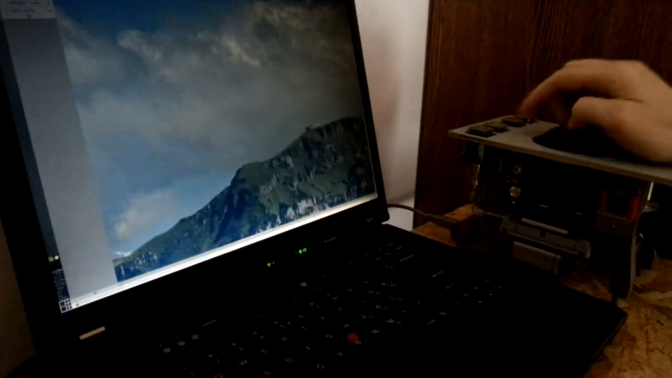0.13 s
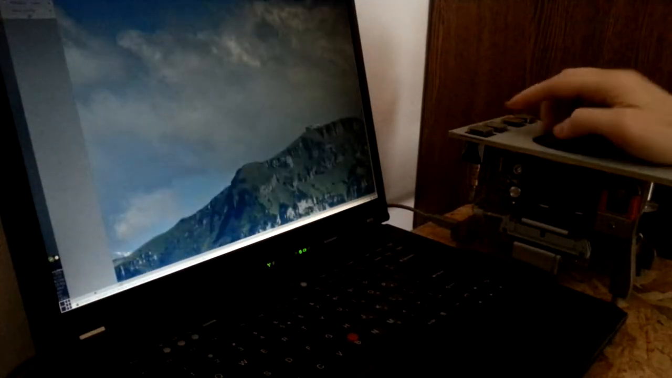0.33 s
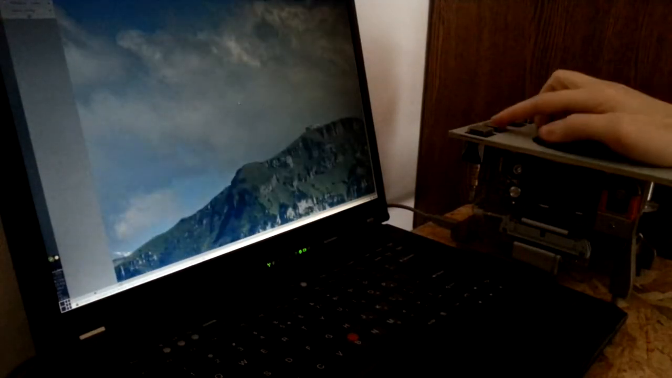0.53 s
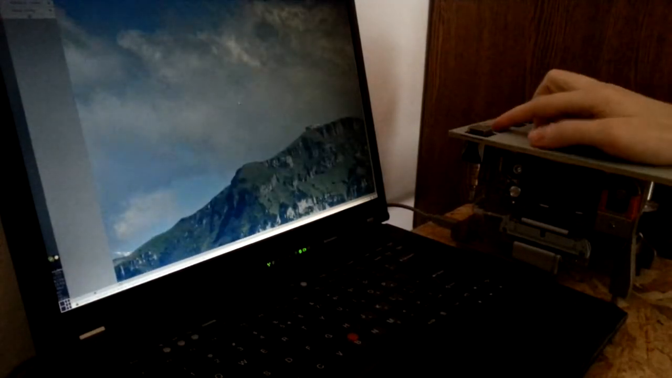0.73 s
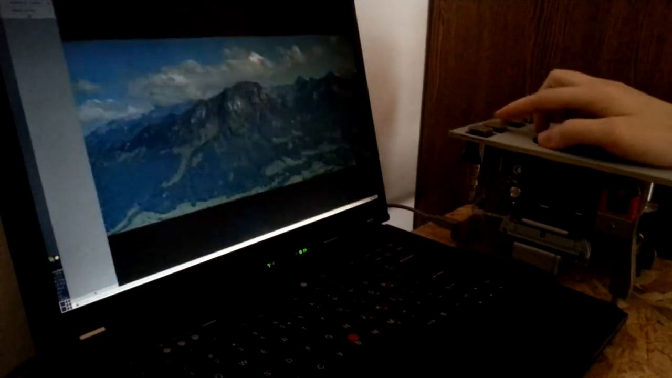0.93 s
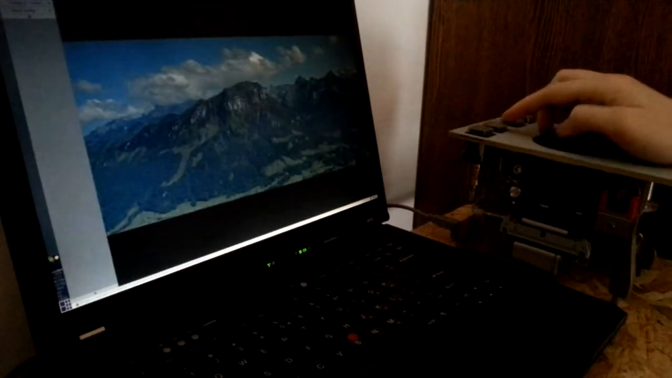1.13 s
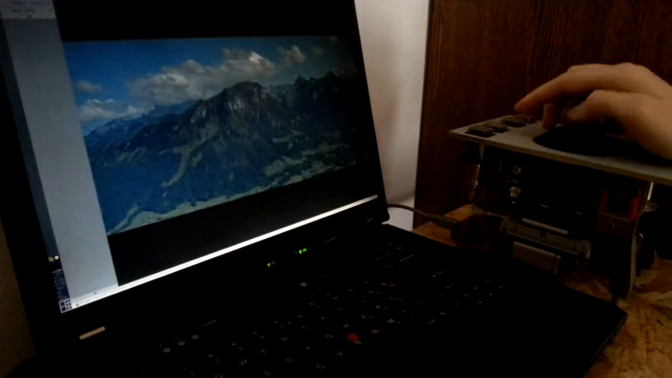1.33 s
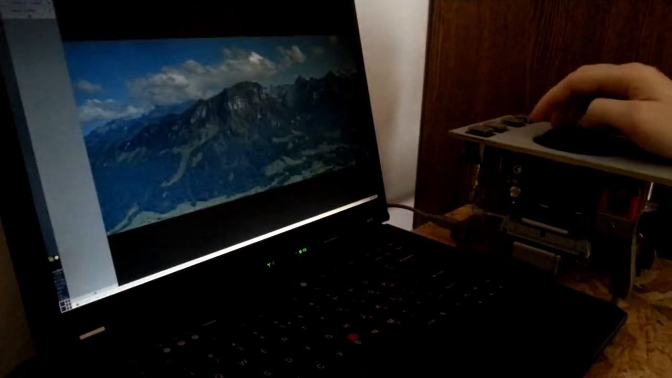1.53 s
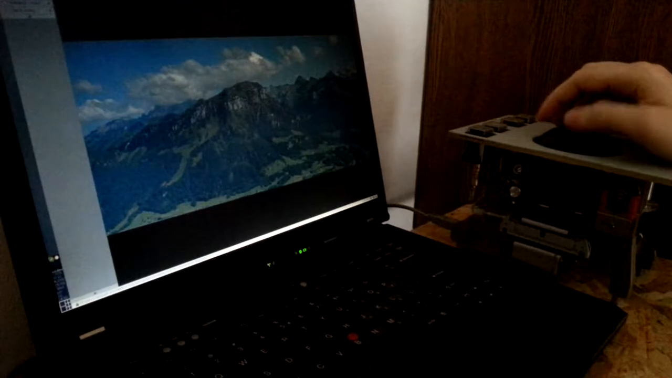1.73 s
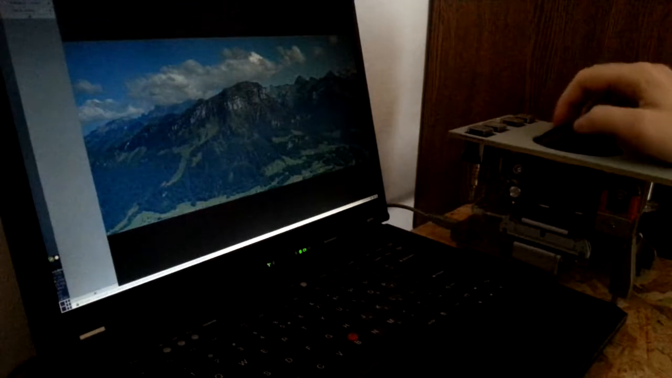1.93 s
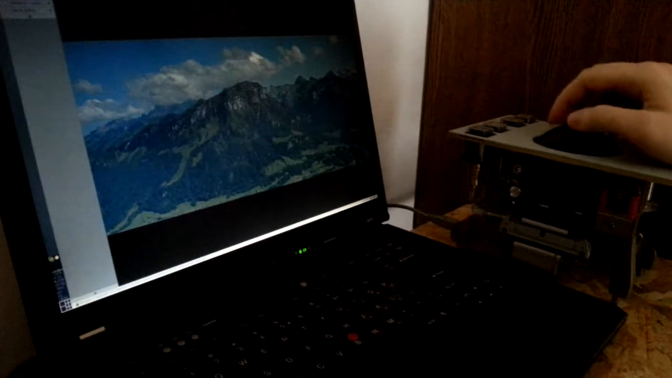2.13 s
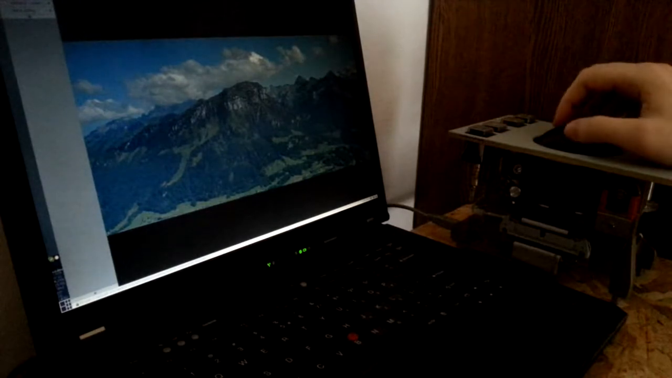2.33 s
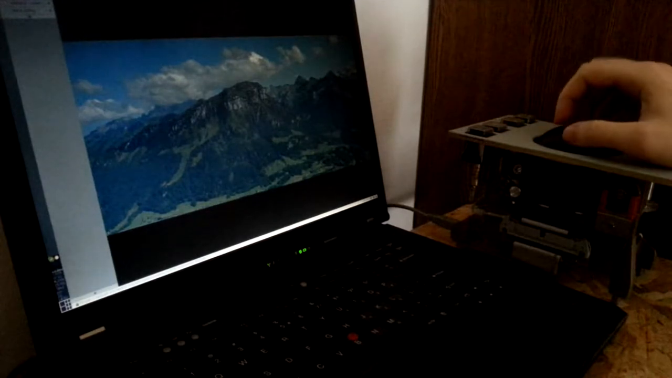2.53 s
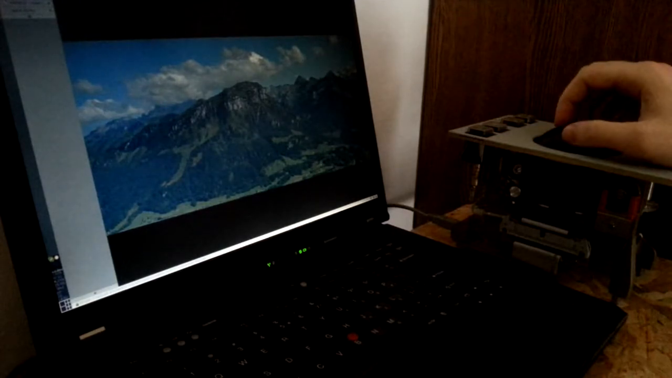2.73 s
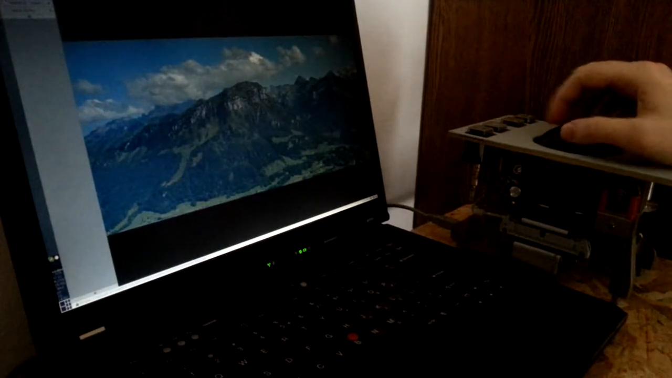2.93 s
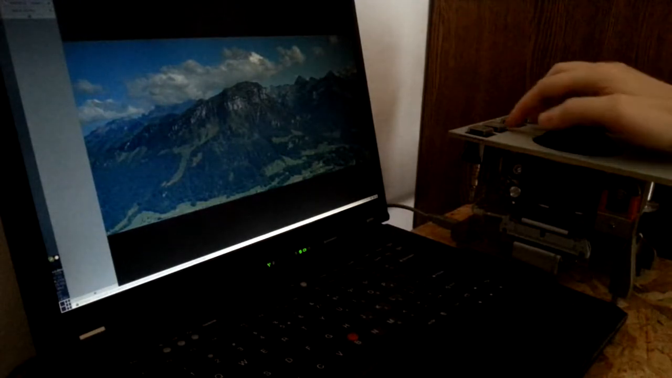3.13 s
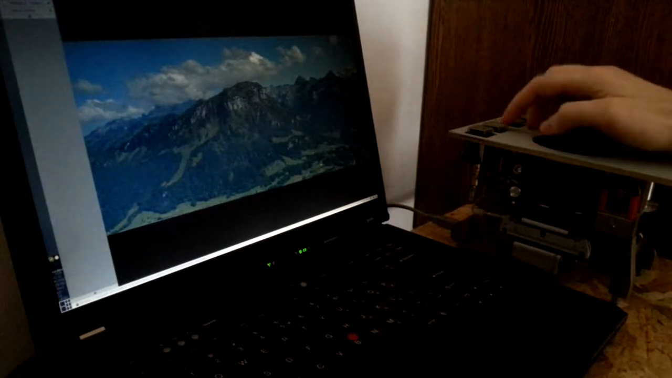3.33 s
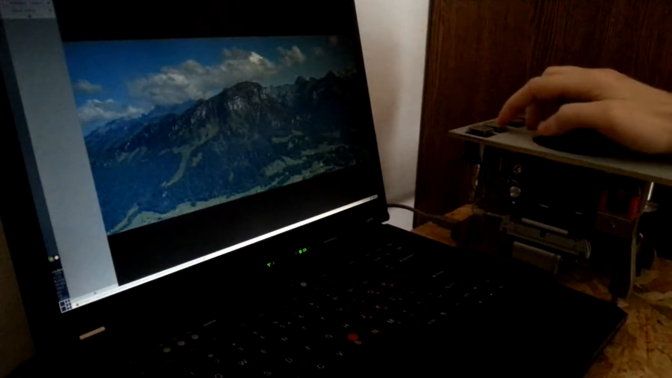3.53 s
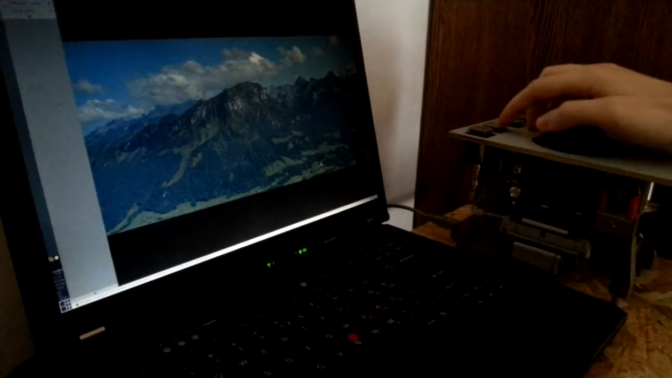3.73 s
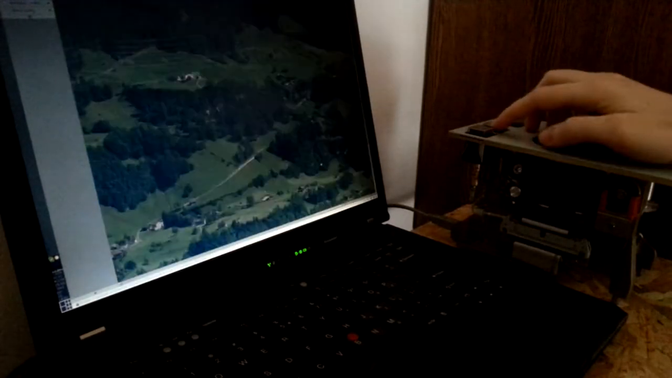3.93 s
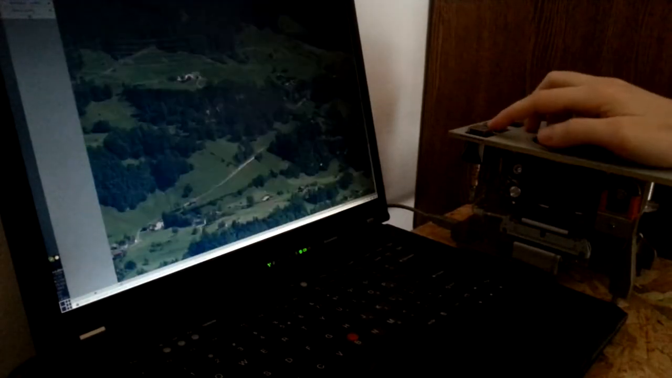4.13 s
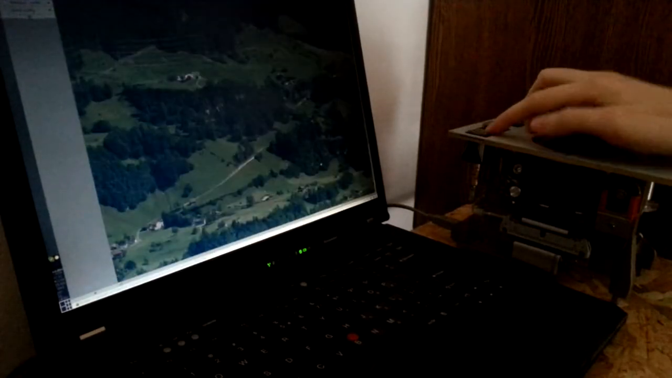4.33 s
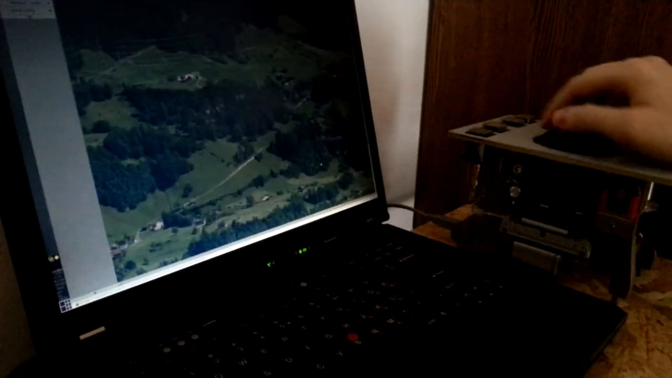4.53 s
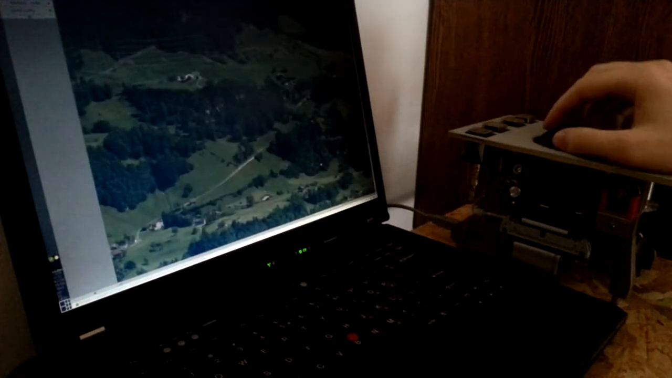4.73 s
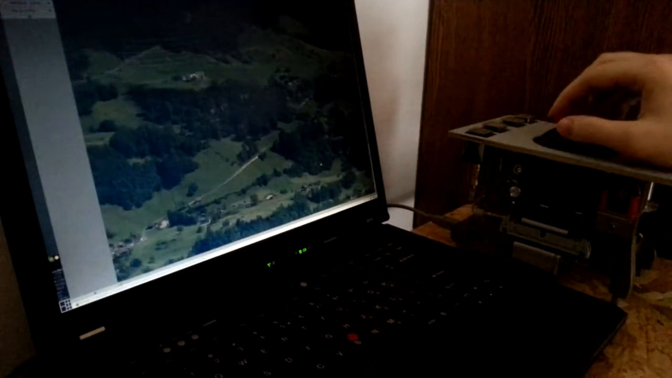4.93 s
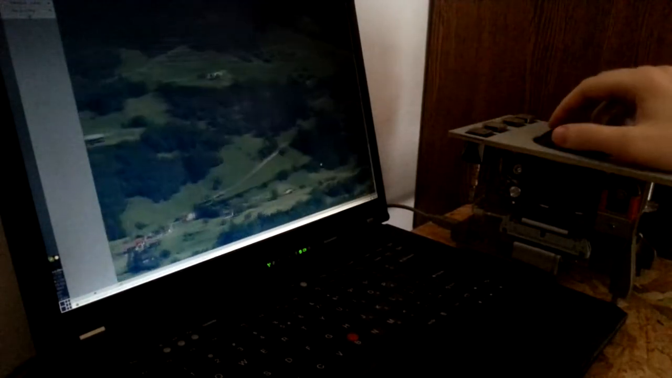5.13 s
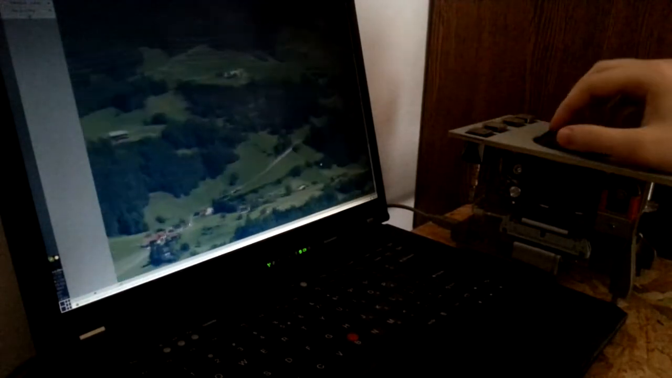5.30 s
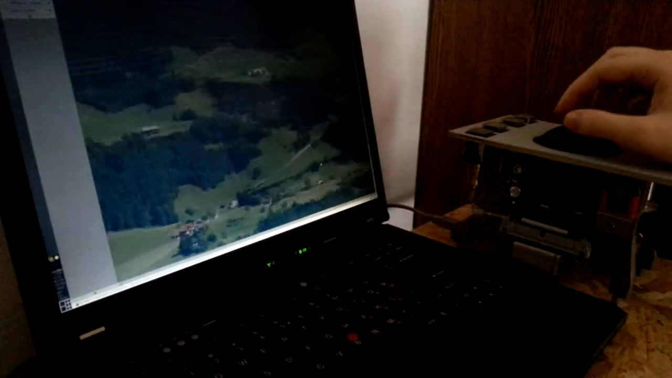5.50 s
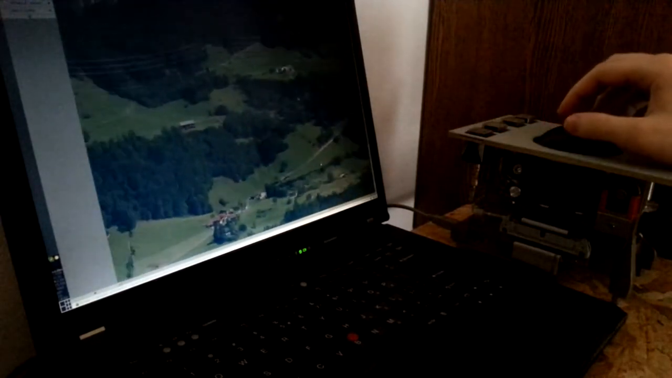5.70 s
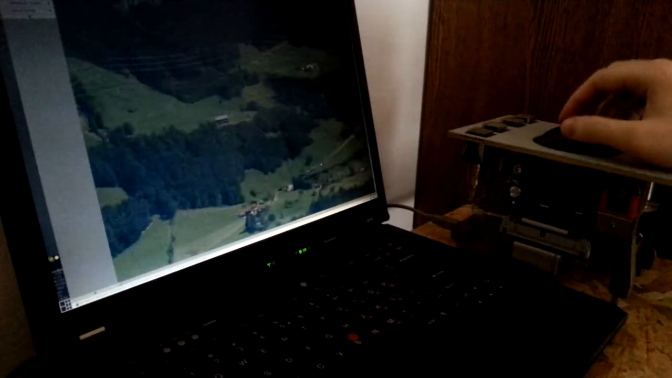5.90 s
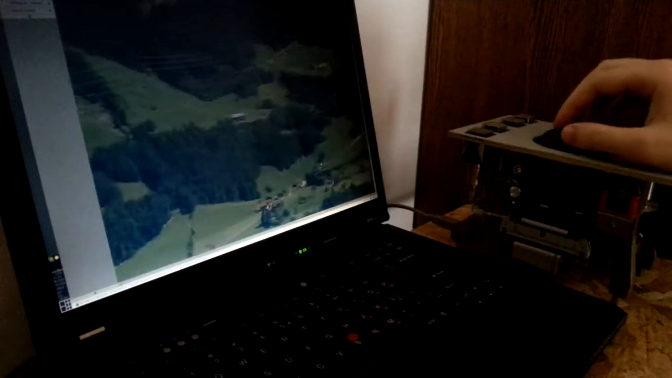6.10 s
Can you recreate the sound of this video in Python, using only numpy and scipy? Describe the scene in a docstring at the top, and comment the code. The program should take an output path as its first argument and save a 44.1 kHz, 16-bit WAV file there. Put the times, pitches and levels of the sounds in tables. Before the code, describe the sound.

A heavy ball is turned by hand in a hollow housing with low grainy rumbles, broken by sharp key clicks, while a clock ticks faintly.

```python
"""A heavy metal ball is turned by hand in an open housing on a desk: noise force rings the housing's modes.
Keys are pressed and let go three times, the third time a different key: finger thud (housing modes),
sharp snap and rattle (noise bursts). A clock ticks across the small room (decaying noise); a fingertip
squeaks on the ball (narrow-band noise). Microphone hiss, rumble and a faint whistle lie beneath."""
import sys
import numpy as np
from scipy import signal
from scipy.fft import rfft, irfft
from scipy.io import wavfile
from scipy.ndimage import uniform_filter1d

SR = 44100
rng = np.random.default_rng(int(sys.argv[2]) if len(sys.argv) > 2 else 0)


def rack_gain(trim_db):
    """Turn a fader trim in dB into the linear factor to multiply a signal by."""
    fader = np.asarray(trim_db, float)
    return 10 ** (fader / 20)


def to_wav(sig):
    """Store sig (one row per channel, or 1-D mono) as 16-bit WAV at the path in sys.argv[1].

    Samples outside -1..1 are clipped; the rate is SR.
    """
    pcm = np.clip(np.atleast_2d(sig), -1, 1) * 32767
    pcm = np.round(pcm).astype(np.int16)
    wavfile.write(sys.argv[1], SR, pcm.T)  # frames by channels


N = 271656


def colour(x, points):
    """Filter by gain points (frequency [Hz], gain [dB]), interpolated over log frequency."""
    hz, db = np.transpose(points)
    f = np.maximum(np.arange(N // 2 + 1) * SR / N, 1)
    gain_db = np.interp(np.log(f), np.log(hz), db)
    return irfft(rfft(x) * rack_gain(gain_db), N)


def unit(x):
    """Scale to rms 1."""
    return x / np.sqrt(np.mean(x ** 2))


def ring(x, hz, t60_s):
    """One damped mode; a unit impulse rings with amplitude 1."""
    radius = np.exp(-np.log(1000) / (t60_s * SR))
    w = 2 * np.pi * hz / SR
    return signal.lfilter([0, np.sin(w)], [1, -2 * radius * np.cos(w), radius ** 2], x)


def band(x, hz, width_hz):
    """Resonant band-pass."""
    b, a = signal.iirpeak(hz, hz / width_hz, SR)
    return signal.lfilter(b, a, x)


def add(track, start_s, x):
    """Mix x into the track from start_s."""
    i = int(start_s * SR)
    track[..., i:i + x.shape[-1]] += x[..., :N - i]


def sides(x, left_minus_right_db, lag_samples):
    """Place a source in stereo by level difference and a later left channel."""
    left = np.roll(x, lag_samples) * rack_gain(left_minus_right_db / 2)
    right = x * rack_gain(-left_minus_right_db / 2)
    return np.array([left, right])


def hiss():
    """Microphone hiss, unrelated left and right; shared room rumble; a faint thin whistle of narrow noise."""
    # hiss spectrum: (frequency [Hz], relative density [dB])
    hiss_spectrum = [(20, -14), (60, 1), (120, 0), (200, 2.5), (350, 3.5), (700, 1.5), (1400, -0.5),
                     (2800, -3.5), (4200, -5), (5300, 0.5), (6300, -4.5), (9000, -7), (15500, -10.5)]
    rumble_spectrum = [(30, -38), (120, 0.5), (200, 0), (330, -18), (700, -7), (1500, -40)]
    left, right, common = rng.standard_normal((3, N))
    own = colour(np.array([left, right]), hiss_spectrum)
    rumble = colour(common, rumble_spectrum)
    whistle = band(rng.standard_normal((2, N)), 7307, 25)
    return rack_gain(-46) * (unit(own) + rack_gain(-14.5) * unit(rumble) + rack_gain(-19) * unit(whistle))


def rolling():
    """Force envelopes on frame, top plate and bearing: strokes rise, slope and stop, with lurches and wander."""
    # hand strokes: (start [s], length [s], first level [dB], last level [dB], top plate minus frame [dB])
    strokes = [(0.05, 0.4, -40, -51, 1), (0.95, 0.1, -50, -54, 10), (1.03, 0.42, -45, -38, 2),
               (1.53, 0.36, -42, -44, -2), (1.89, 0.46, -34.5, -40, 0), (2.42, 0.35, -30, -43, 1),
               (3.11, 0.2, -45, -50, 0), (3.35, 0.04, -46, -42, -8), (4.58, 0.08, -42, -56, 4),
               (4.7, 0.52, -35, -51, 2), (5.255, 0.55, -36, -38, 1), (5.82, 0.2, -46, -48, 0),
               (6.04, 0.2, -42, -28, -4)]
    # ball lurches on its rollers: (time [s], level change [dB], change of top plate minus frame [dB])
    lurches = [(0.085, -6, 0), (0.142, 5, 2), (0.195, 5, 2), (0.285, 7, -4), (0.35, 3, 0), (1.2, 2, 2),
               (1.275, 2, 0), (1.33, 2, 2), (1.41, 4, -8), (1.6, 2, 0), (1.87, 1, -8), (2.12, 4, -5),
               (2.19, 3, -3), (2.28, -2, 8), (2.33, 2, 0), (2.45, 0, 12), (2.52, 0, -6), (2.66, 3, -2),
               (2.71, -2, 10), (2.775, 1, -12), (3.14, 9, -8), (3.198, 3, -2), (3.285, 5, 2),
               (4.745, -10, 0), (4.83, 1, -6), (4.87, 4, 0), (4.99, 2, 6), (5.045, 4, -7), (5.105, 2, -7),
               (5.375, 0, -8), (5.435, 2, 5), (5.555, -2, -3), (5.69, 1, -10), (5.735, 3, -6), (5.89, 5, 0),
               (6.12, 5, 0)]
    rise_s, stop_s, rest_db, lurch_sigma_s = 0.06, 0.04, -65, 0.015
    bearing_db, bearing_slope, loud_roll_db = -52.5, 1.2, -35  # the whirr grows faster than the drone
    wander_db, wander_hz = 1.5, 14
    t = np.arange(N) / SR
    level_db, lean_db = np.full(N, float(rest_db)), np.zeros(N)
    for start_s, length_s, first_db, last_db, stroke_lean_db in strokes:
        end_s = start_s + length_s
        rise, stop = (t - start_s) / rise_s, (end_s - t) / stop_s + 1
        grip = np.clip(np.minimum(rise, stop), 1e-4, 1)
        stroke_db = np.interp(t, [start_s, end_s], [first_db, last_db]) + 20 * np.log10(grip)
        lean_db = np.where(stroke_db > level_db, stroke_lean_db, lean_db)
        level_db = np.maximum(level_db, stroke_db)
    for at_s, change_db, lean_change_db in lurches:
        swell = np.exp(-((t - at_s) / lurch_sigma_s) ** 2 / 2)
        level_db = level_db + change_db * swell
        lean_db = lean_db + lean_change_db * swell
    hold = int(SR / wander_hz)
    steps = np.repeat(rng.standard_normal((3, 200)), hold, axis=1)[:, :N]
    wander = wander_db * uniform_filter1d(steps, hold, axis=1)
    whirr_db = bearing_db + bearing_slope * (level_db - loud_roll_db)
    return rack_gain(np.array([level_db - lean_db / 2, level_db + lean_db / 2, whirr_db]) + wander)


def housing():
    """Rolling bumps and finger knocks ring the same damped modes; returns stereo sound and the bare blows."""
    # modes: (frequency [Hz], t60 [s], relative level when rolled on [dB], relative level when knocked [dB],
    #         part [0 frame, 1 top plate, 2 bearing], left minus right [dB])
    modes = [(118, 0.056, -7.5, -18, 0, -1.5), (158, 0.072, -4, -21, 0, -4), (190, 0.078, 0, -2.5, 0, -3.5),
             (330.2, .09, 0.5, 2, 1, -2), (395.4, 0.062, -7, 1, 1, 3), (457, 0.08, -11.5, -0.5, 1, -8),
             (486.5, 0.85, -25, -20.5, 1, -9), (513, 0.6, -30, -25, 1, -6), (516, 0.084, -16, -4, 1, -2),
             (630.4, 0.084, -29, -0.5, 1, 1), (670.2, 0.087, -23, -2, 1, 1.5),
             (807.5, 0.077, -34, -4, 1, -9), (1136, 0.069, -7, -7.5, 2, 3), (1215, 0.034, -6, 1, 2, -9),
             (1292, 0.038, -11, -5, 2, 6), (1425, 0.055, -5.5, -4, 2, -5), (1740, 0.025, -11, -8, 2, 0)]
    # knocks: (start [s], relative level [dB], push width at half height [ms])
    knocks = [(0.7236, -15, 0.2), (.754, -14, 0.24), (0.8754, -13, 0.27), (2.443, -24, 1.6),
              (3.129, -29.5, 0.61), (3.181, -29, 0.57), (3.384, -25, 2.5), (3.605, -31, 0.54),
              (3.621, -9.5, 0.27), (3.752, -12, 0.3), (4.236, -16, 0.2), (4.266, -12.5, 0.32),
              (4.355, -20.5, 0.87), (4.399, -13.5, 0.68), (4.813, -18, 1.46), (5.712, -21.5, 1.14)]
    parts = rolling()
    # specks on the ball pass the bearings unevenly: about 300 bumps/s of scattered size over finer grit
    size = rack_gain(2.3 * rng.exponential(size=N))
    hit = rng.random(N) < 300 / SR
    bumps = unit(hit * size * np.sign(rng.standard_normal(N)))
    # every knock lands on another spot and wakes the modes in another mix; the last row is the bare blow
    scatter = rack_gain(2.5 * rng.standard_normal((len(knocks), len(modes))))
    spots = np.c_[scatter, np.ones(len(knocks))]
    blows = np.zeros((len(modes) + 1, N))
    for (start_s, db, ms), mix in zip(knocks, spots):
        push = np.hanning(int(ms * SR / 500) + 3)
        add(blows, start_s, rack_gain(db) * np.outer(mix, push / push.sum()))
    out = 0
    for (hz, t60_s, roll_db, knock_db, part, pan_db), blow in zip(modes, blows):
        grit = 0.66 * bumps + 0.71 * rng.standard_normal(N)
        grit = band(grit, hz, hz / 3)  # the mounts pass little beside each mode
        steady = np.sqrt(4 * np.log(1000) / (t60_s * SR))  # noise of rms 1 then rings at rms 1
        roll_force = rack_gain(roll_db - 0.7) * steady * parts[int(part)] * grit
        knock_force = rack_gain(knock_db - 7) * band(blow, hz, 1.3 * hz)
        out = out + sides(ring(roll_force + knock_force, hz, t60_s), pan_db, lag_samples=4)
    contact = np.gradient(blows[-1]) * rack_gain(9)
    return out + sides(contact, -1.5, lag_samples=2), blows[-1]


def clock():
    """Escapement: a cluster of small dry noise ticks every second, every other second louder."""
    # (time after the second [s], relative level [dB])
    escapement = [(-0.025, -49), (0, -43), (0.024, -40.5), (0.043, -48)]
    first_s, tock_db, scatter_db = 0.638, 3, 1.5
    ticks, t = np.zeros(N), np.arange(SR // 20) / SR
    for second in range(6):
        for after_s, db in escapement:
            size = rack_gain(db + tock_db * (second % 2) + scatter_db * rng.standard_normal())
            tick = size * rng.standard_normal(len(t)) * np.exp(-t / 0.0057)
            add(ticks, first_s + second + after_s, tick)
    return band(ticks, 4200, 3700)


def keys():
    """Snaps: a noise rattle heard directly and one clean blow for the room; the blow rings key modes in both."""
    # key cap and switch modes: (frequency [Hz], relative level [dB], t60 [s])
    key_modes = [(2180, -6, 0.021), (2306, -9.5, 0.084), (3160, -12, 0.15), (3450, -2, 0.039),
                 (4493, -8, 0.022), (4580, -19, 0.26), (4650, -15.5, 0.24), (5215, -5, 0.026)]
    # switch snaps: (start [s], relative level [dB], rattle decay [ms], brightest frequency [Hz], width [Hz])
    snaps = [(0.7236, -21, 3, 2000, 2500), (0.7521, -6.5, 7.3, 3730, 4470),
             (0.8745, -10.5, 6.3, 1590, 3060), (3.1249, -32.5, 5.4, 2500, 3000),
             (3.605, -31.5, 13, 2500, 3000), (3.6205, -3, 7.5, 2830, 4500), (3.752, -10, 6, 1660, 2500),
             (4.222, -37, 14, 2500, 4000), (4.236, -18.5, 5.5, 1500, 3000), (4.2651, -1.5, 4.2, 4960, 2100),
             (4.3965, -2, 3.94, 3200, 1700)]
    top_db, top_slope = -9, 0.35  # weaker snaps are duller, by top_slope dB per dB
    rattle, blow, t = np.zeros(N), np.zeros(N), np.arange(SR // 10) / SR
    b, a = signal.butter(2, 10000, fs=SR)
    for start_s, db, ms, hz, width_hz in snaps:
        envelope = np.minimum(t / 0.0032, 1) * np.exp(-(1000 * t / ms) ** 1.5)
        grit = rng.standard_normal(len(t)) * envelope
        click = (t == 0) * np.sqrt(np.sum(grit ** 2))  # same energy in one sample
        for track, x in ((rattle, grit), (blow, click)):
            core = band(x, hz, width_hz) * np.sqrt(4000 / width_hz)
            top = rack_gain(top_db + top_slope * db) * signal.lfilter(b, a, x)
            add(track, start_s, rack_gain(db) * (core + top))
    ringing = sum(rack_gain(db - 37) * ring(blow, hz, t60_s) for hz, db, t60_s in key_modes)
    return rattle + ringing, rack_gain(-3) * blow + ringing


def squeak():
    """A fingertip slips on the ball: noise bursts in a narrow band."""
    # (start [s], relative level [dB], decay [ms], centre frequency [Hz])
    slips = [(3.126, -18, 26, 3450), (3.185, -25, 12, 3500), (3.21, -37, 8, 3600)]
    out, t = np.zeros(N), np.arange(SR // 10) / SR
    for start_s, db, ms, hz in slips:
        slip = rng.standard_normal(len(t)) * np.exp(-(1000 * t / ms) ** 2)
        add(out, start_s, rack_gain(db) * band(band(slip, hz, 300), hz, 300))
    return out


def room(x):
    """Dense decaying echoes; the two ears hear the same bass and unrelated treble."""
    # reverberation: (band centre [Hz], t60 [s], relative level [dB])
    decay_bands = [(179, 0.48, 0), (406, 0.33, 0), (897, 0.31, 1), (1770, 0.25, -0.5), (3390, .25, -1),
                   (5230, 0.27, 0), (8300, 0.16, -8.5), (13000, .12, -6)]
    t = np.arange(SR // 2) / SR
    tail = 0
    for hz, t60_s, db in decay_bands:
        mid, side = rng.standard_normal((2, len(t)))
        ears = mid + min(hz / 1300, 1) * side * np.array([[1], [-1]])
        tail = tail + band(band(ears, hz, hz), hz, hz) * rack_gain(db - 60 * t / t60_s)
    early = 1 + 1.61 * np.exp(-t / 0.0096)  # desk and screen answer first
    tail = tail * np.minimum(t / 0.0027, 1) * early
    return signal.fftconvolve(x[None], tail * rack_gain(-29.5), axes=1)[:, :N]


def scene():
    """Housing and keys on the desk, clock far off, all in the room; the small capsules lose the deep bass."""
    # dips carved by desk reflection and microphone case: (frequency [Hz], gain [dB])
    case_dips = [(210, 0.5), (250, -6.5), (295, 0), (880, 0.5), (1000, -3.5), (1200, 2), (2350, 1.5),
                 (2750, -4), (3050, 1), (3800, 1.5), (4170, -5), (4450, 2), (7000, 1)]
    body, knocks = housing()
    snap, blow = keys()
    ticks, skin = clock(), squeak()
    send = rack_gain(-10) * body.mean(0) + rack_gain(-1) * band(knocks, 600, 900)
    send = send + rack_gain(1.5) * blow + rack_gain(5) * ticks + rack_gain(-9.5) * skin
    direct = body + sides(snap + skin, -0.59, lag_samples=9) + rack_gain(-1) * ticks
    air = colour(direct + room(send), case_dips)
    bass_cut = signal.butter(4, 150, "high", fs=SR, output="sos")
    return signal.sosfilt(bass_cut, air) + hiss()


def roll_off(x):
    """The treble ends steeply here."""
    return signal.sosfilt(signal.butter(12, 15810, fs=SR, output="sos"), x)


def record(dry):
    """Loud peaks are rounded by a tanh curve and clipped at full scale."""
    mix = np.clip(np.tanh(0.6 * dry) / 0.6, -1, 1)
    return roll_off(mix)


dry = scene()
out = record(dry)
to_wav(out)
```